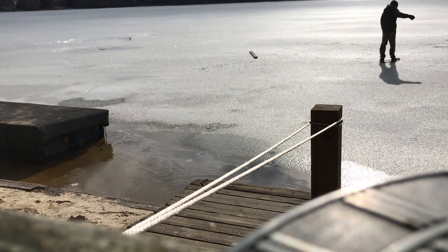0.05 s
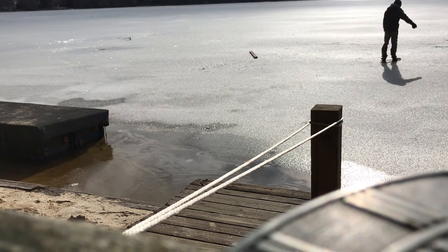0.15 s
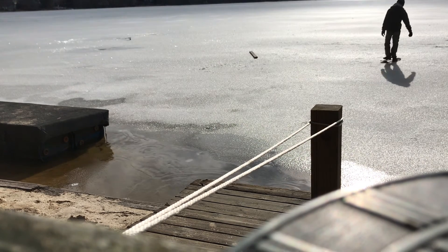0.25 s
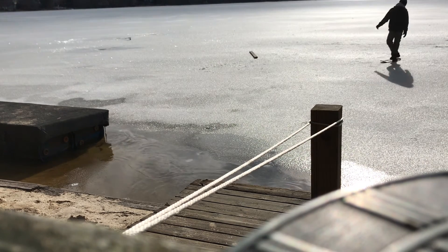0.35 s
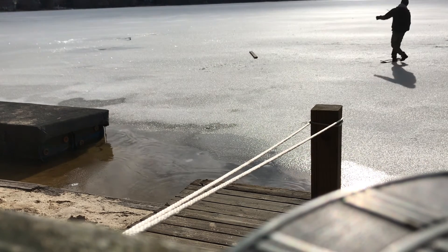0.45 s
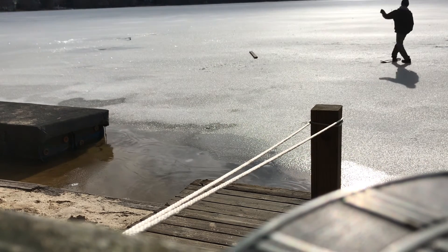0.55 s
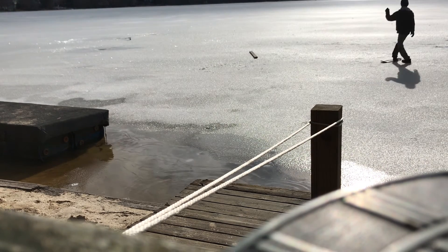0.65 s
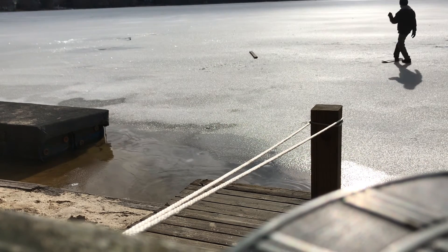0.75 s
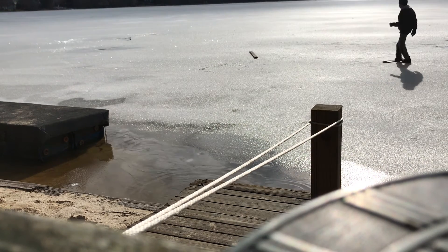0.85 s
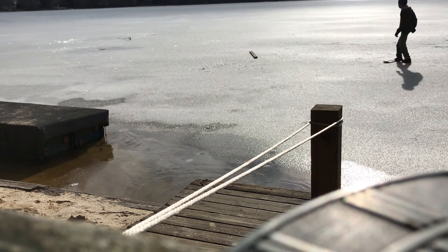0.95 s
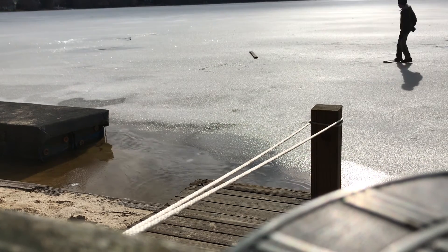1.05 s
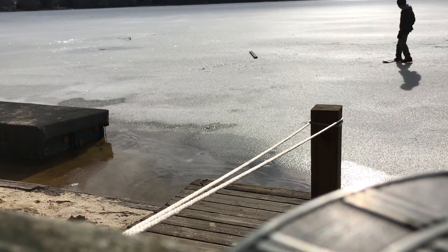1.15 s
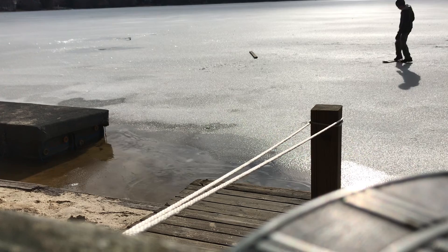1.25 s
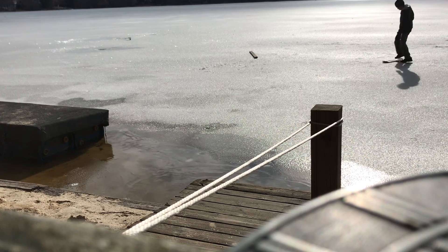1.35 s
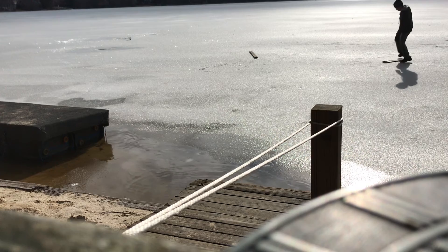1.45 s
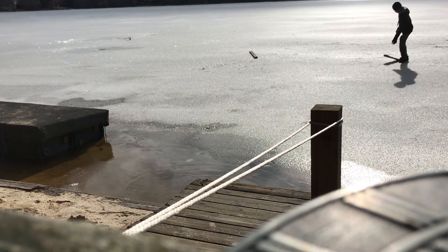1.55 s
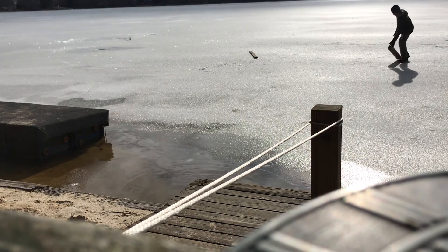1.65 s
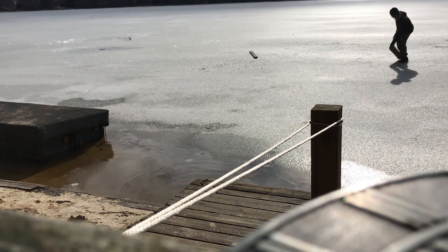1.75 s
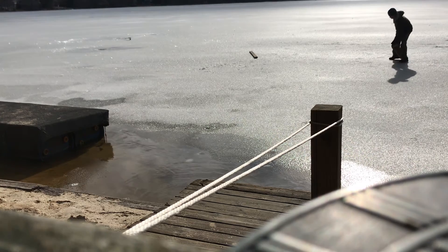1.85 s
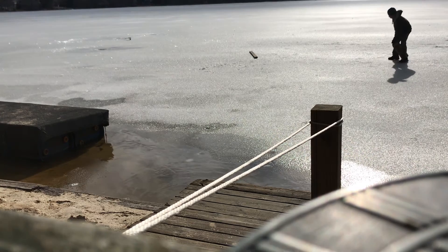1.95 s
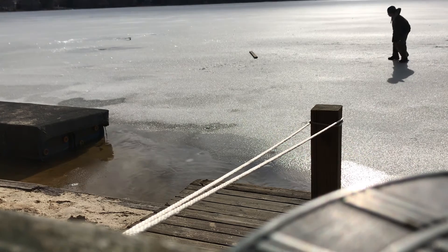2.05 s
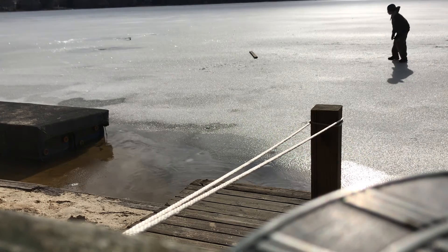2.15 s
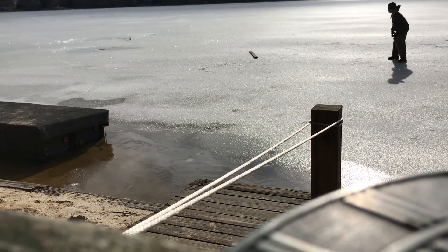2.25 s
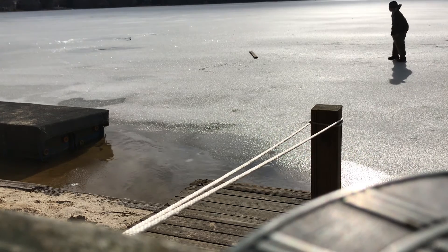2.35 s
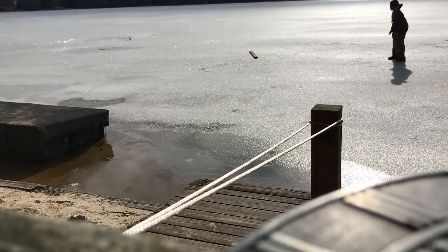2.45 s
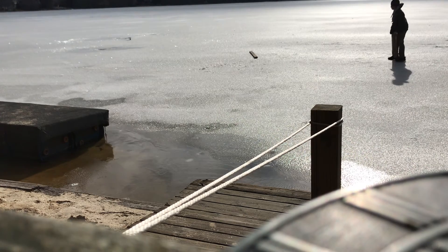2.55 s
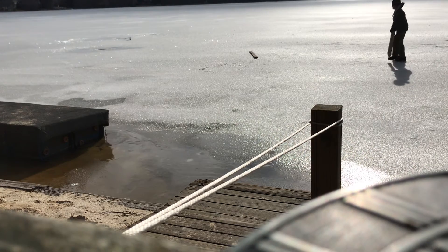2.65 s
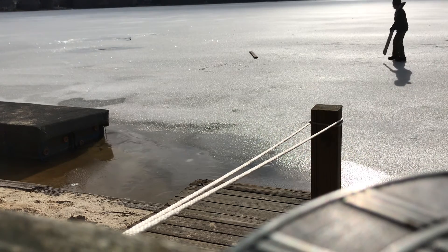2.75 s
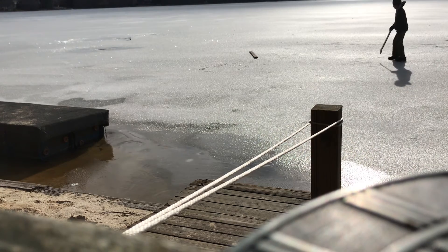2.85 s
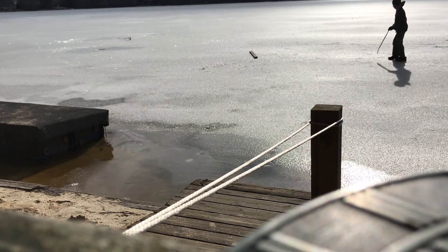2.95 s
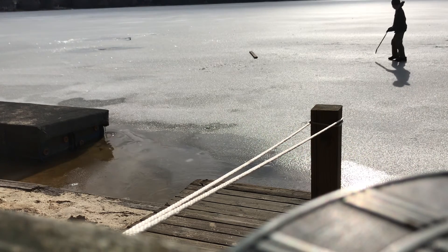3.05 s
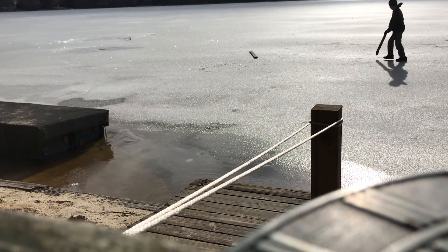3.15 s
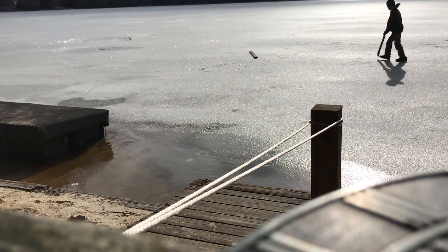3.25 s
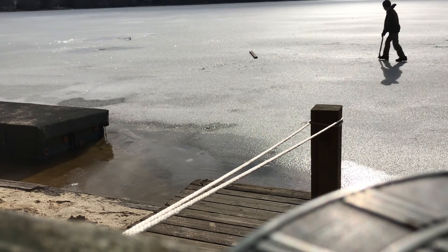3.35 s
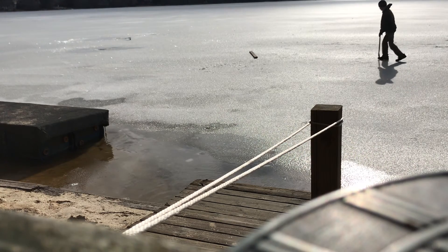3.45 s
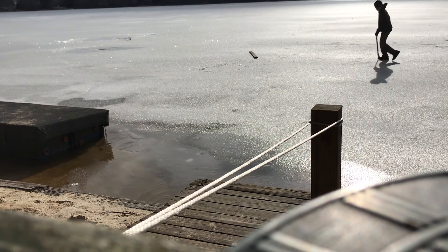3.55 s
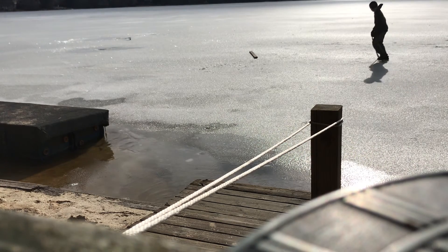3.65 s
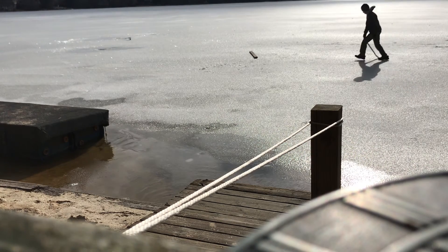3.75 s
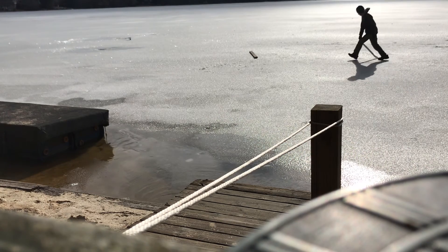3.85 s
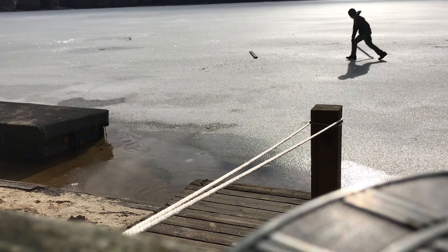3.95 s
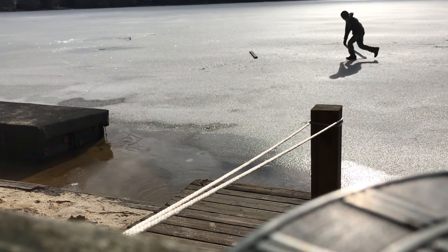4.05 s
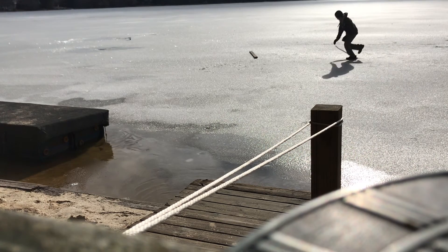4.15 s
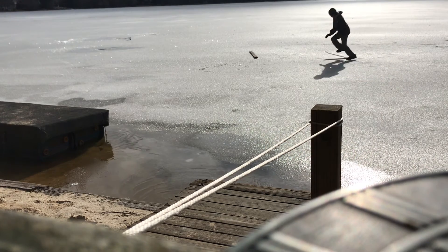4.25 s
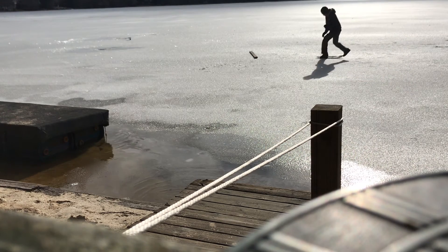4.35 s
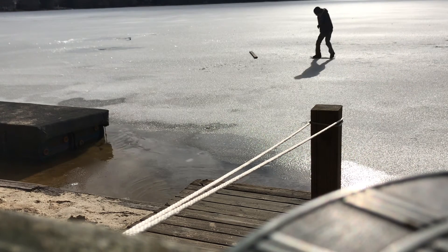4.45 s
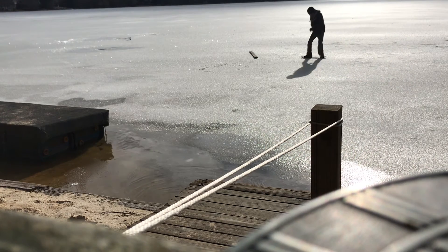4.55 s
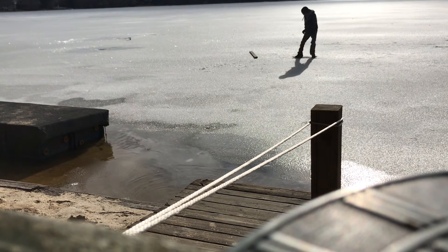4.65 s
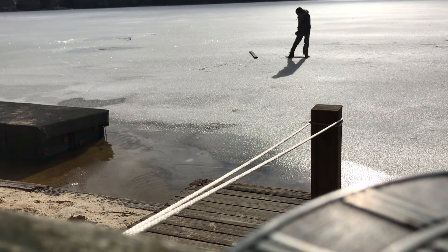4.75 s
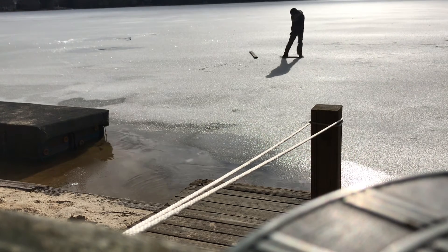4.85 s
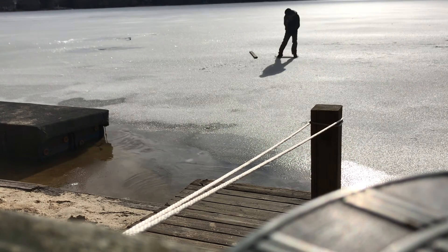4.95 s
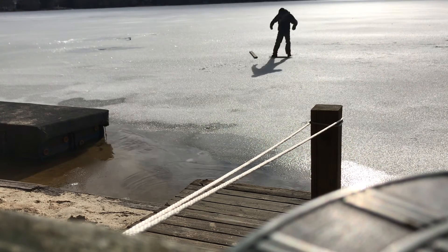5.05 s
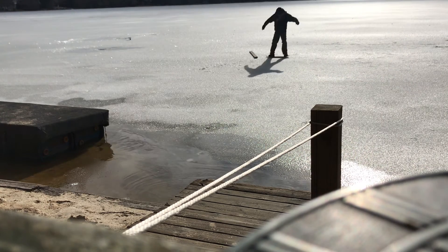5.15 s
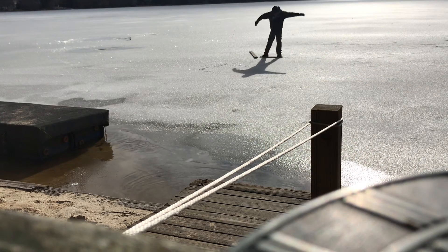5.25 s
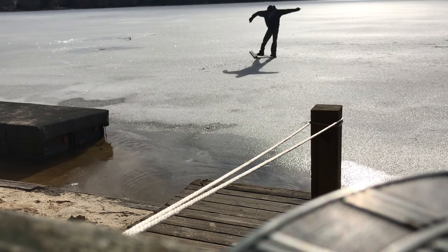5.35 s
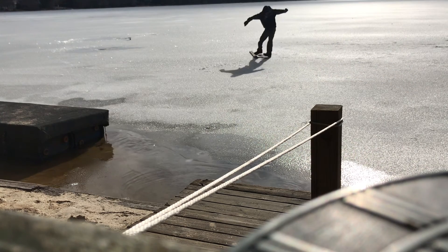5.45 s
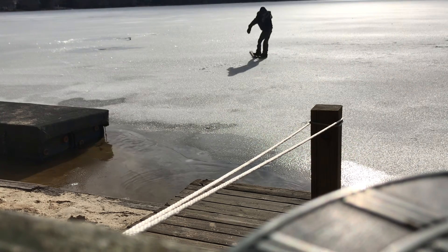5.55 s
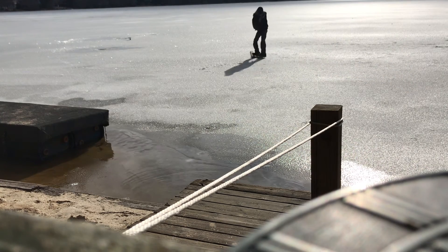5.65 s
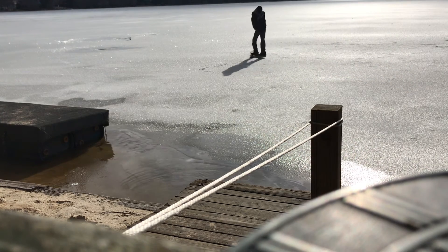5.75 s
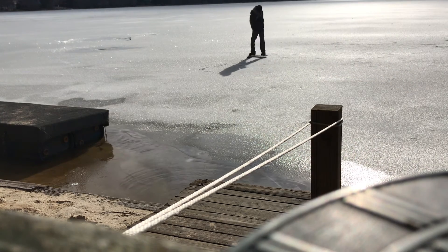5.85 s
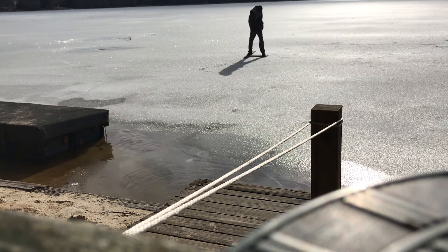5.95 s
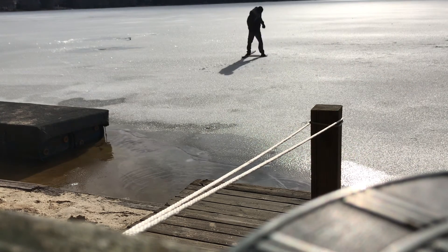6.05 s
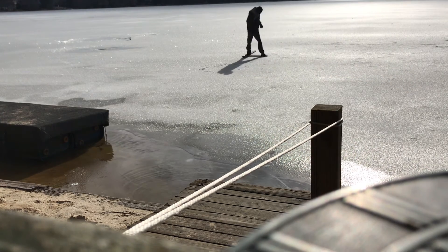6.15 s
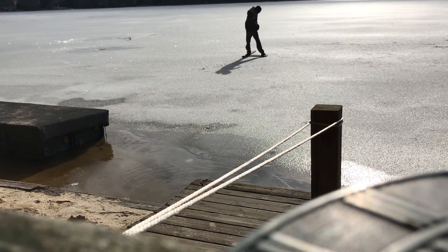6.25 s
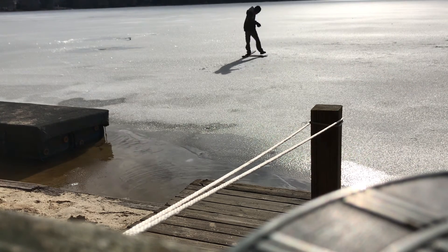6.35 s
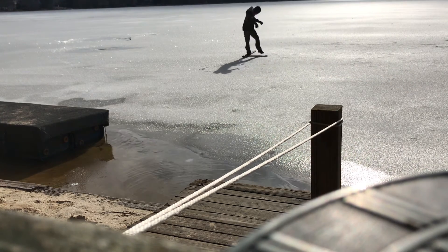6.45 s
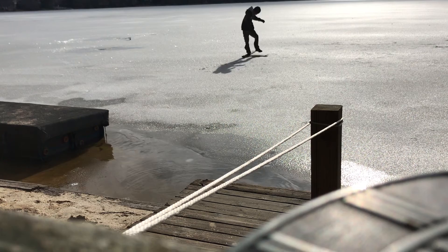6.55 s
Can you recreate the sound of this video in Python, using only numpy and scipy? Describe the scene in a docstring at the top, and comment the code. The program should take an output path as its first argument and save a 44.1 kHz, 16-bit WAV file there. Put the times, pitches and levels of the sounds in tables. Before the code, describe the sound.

Outdoors by a frozen lake, the microphone on the shore hears low distant murmur, faint hiss and light wind rumble. At 0 s a short boot scuff fades, with a few crust clicks around 0.1 s. Small ticks and dull knocks follow near 0.5-1.2 s, then a soft shuffle with clicks and crunches from 1.5 to 2 s. A very faint thin bird whistle comes at 1.4 s and again at 3.75 s. From 2 to 3.9 s it is nearly quiet, with sparse ticks. Light quick steps tick at 3.9-4.3 s, then a loud sharp crack and knock at 4.36-4.45 s starts a gritty, hollow, changing scrape full of crunches. A snap at 4.88 s and the strongest double crack at 5.05 s follow, with more snaps to 5.4 s. The scraping thins out by 6.1 s while low wind buffets thump, and rumble surges at the very end, 6.6 s.

```python
"""Boots and a board scrape and crunch the crust of a frozen lake: a shuffle, then a run and a slide.
Scrapes are clumped random grains ringing crust modes and a moving hollow; snaps are short ringing bursts.
Low thuds are gliding sine pulses: knocks through the ice, and at the end low wind buffets on the microphone.
A small bird seeps twice, a whistle of drifting pitch; a faint scatter follows the feet.
Far air murmur, hiss and wind rumble are shaped noise."""
import sys
import numpy as np
from scipy import signal
from scipy.fft import rfft, irfft
from scipy.io import wavfile

SR = 44100
rng = np.random.default_rng(int(sys.argv[2]) if len(sys.argv) > 2 else 0)


def store_pcm(level_fs):
    """Save levels as 16-bit WAV."""
    pcm = np.round(np.clip(level_fs, -1, 1) * 32767).astype(np.int16)
    wavfile.write(sys.argv[1], SR, np.atleast_2d(pcm).T)


N = 291060

# resonances of crust and board: (pitch [Hz], width [Hz], relative level [dB])
KNOCK_MODES = [(670, 152, 1), (920, 148, 5), (1363, 164, 1), (1734, 225, 2.5), (2070, 347, -3)]
# crust and board, upper range: (pitch [Hz], width [Hz], relative level [dB])
GRIT_MODES = [(3024, 2250, 8), (3780, 1810, 11), (4610, 410, 8), (5380, 1140, -4), (6664, 560, 3),
              (6720, 285, 4)]
# crust and board, top range: (pitch [Hz], width [Hz], relative level [dB])
FIZZ_MODES = [(7900, 4500, 12), (10100, 810, -24), (11400, 970, 4), (13400, 5000, -11), (16300, 6600, 7)]
SCUFF_HOLLOW_HZ = 1108


def from_db(db):
    """Gain of a level in dB."""
    return 10 ** (np.asarray(db) / 20)


def rms_one(x):
    """Scale to rms 1."""
    return x / np.sqrt(np.mean(x ** 2) + 1e-20)


def in_time(rows):
    """Columns of a curve, interpolated at each sample."""
    s, *columns = np.transpose(rows)
    return [np.interp(np.arange(N) / SR, s, c) for c in columns]


def in_spans(tables, fade_s):
    """Joined curves of several spans, and a gate that is open inside them."""
    t = np.arange(N) / SR
    gate = 0
    for rows in tables:
        edge_s = np.minimum(t - rows[0][0], rows[-1][0] - t)
        gate = gate + np.clip(edge_s / fade_s + .5, 0, 1)
    return gate, in_time([row for rows in tables for row in rows])


def drift(rate_hz):
    """Slow random curve of rms 1: noise through a double pole, run at SR / 10."""
    r = np.exp(-20 * np.pi * rate_hz / SR)
    noise = rng.standard_normal(N // 10 + 4002)
    slow = signal.lfilter([1], [1, -2 * r, r * r], noise)[4000:]
    return np.interp(np.arange(N) / 10, np.arange(len(slow)), rms_one(slow))


def resonance(hz, width_hz):
    """Two-pole band-pass with gain 1 on top."""
    r = np.exp(-np.pi * width_hz / SR)
    return (1 - r * r) / 2 * np.array([1, 0, -1]), [1, -2 * r * np.cos(2 * np.pi * hz / SR), r * r]


def body(x, modes, shifting_db=0):
    """Parallel resonances that keep the level of white noise; their balance may shift as the contact moves."""
    click = np.zeros(4096)
    click[0] = 1
    gains = [(-1) ** k * from_db(db) for k, (hz, width_hz, db) in enumerate(modes)]
    filters = [resonance(hz, width_hz) for hz, width_hz, db in modes]
    response = sum(g * signal.lfilter(*f, click) for g, f in zip(gains, filters))
    scale = np.sqrt(np.sum(response ** 2))
    shifts = [from_db(shifting_db * drift(7.4)) if shifting_db else 1 for f in filters]
    return sum(g * shift * signal.lfilter(*f, x + 1e-18)
               for g, shift, f in zip(gains, shifts, filters)) / scale


def coloured(spectrum):
    """Steady noise of rms 1, its spectrum interpolated over log frequency."""
    hz = np.fft.rfftfreq(N, 1 / SR) + 1
    at_hz, db = np.transpose(spectrum)
    gain = from_db(np.interp(np.log(hz), np.log(at_hz), db))
    return rms_one(irfft(rfft(rng.standard_normal(N)) * gain, N))


def air():
    """Distant murmur, faint hiss and lumpy wind rumble: shaped noise on slow level curves."""
    # open air: (time [s], murmur level [dB], hiss level [dB])
    air_curve = [(0, -55, -74.5), (2, -55.5, -73.5), (4, -56, -75.5), (5, -51.5, -69), (6.1, -51, -70),
                 (6.6, -53, -73.5)]
    # wind on the microphone, rising at the end: (time [s], rumble level [dB])
    wind_curve = [(0.0, -50), (0.8, -54), (1.6, -52.5), (2.4, -58), (3.3, -54.5), (4.13, -58.5),
                  (4.45, -55), (5.55, -60), (5.65, -52), (5.89, -47.5), (6.1, -38), (6.31, -47),
                  (6.45, -40.5), (6.55, -48), (6.6, -21)]
    # (frequency [Hz], relative density [dB per Hz])
    murmur_spectrum = [(65, -9), (110, -5), (134, -1), (163, -9), (407, -16.5), (615, -19.5), (777, -19.5),
                       (930, -19), (1040, -19.5), (1380, -24.5), (8000, -56), (10400, -73), (17600, -120)]
    # (frequency [Hz], relative density [dB per Hz])
    hiss_spectrum = [(1760, -24), (3000, -11), (4070, -10.5), (10600, -17.5), (12900, -12.5),
                     (15700, -18.5), (16100, -36), (16400, -42)]
    # (frequency [Hz], relative density [dB per Hz])
    rumble_spectrum = [(15, -29), (25, 12.5), (49, -5.5), (64, 7), (107, -10.5), (145, -10.5), (220, -19.5),
                       (290, -69), (480, -120)]
    murmur_db, hiss_db = in_time(air_curve)
    rumble_db, = in_time(wind_curve)
    waver_db = .6 * drift(5)
    gusts_db = 1.2 * drift(12) + 2 * drift(1.75)
    murmur = from_db(murmur_db + waver_db) * coloured(murmur_spectrum)
    hiss = from_db(hiss_db) * coloured(hiss_spectrum)
    rumble = from_db(rumble_db + gusts_db) * coloured(rumble_spectrum)
    return murmur + hiss + rumble


def bird():
    """A thin whistle: a sine that slurs up, sags, and drifts in pitch and level."""
    # bird notes: (start [s], top pitch [Hz], top level [dB])
    seeps = [(1.4, 8857, -76), (3.745, 8559, -79)]
    rise_s, length_s, slur_hz, sag_hz = 0.033, 0.13, 170, 70
    start_db, end_db = -8.5, -5.0   # re top
    notes = [[(s, hz - slur_hz, db + start_db), (s + rise_s, hz, db),
              (s + length_s, hz - sag_hz, db + end_db)] for s, hz, db in seeps]
    gate, (hz, level_db) = in_spans(notes, fade_s=.015)
    phase = 2 * np.pi * np.cumsum(hz + 40 * drift(60)) / SR
    return gate * from_db(level_db + 3.1 * drift(40)) * np.sin(phase)


def shore(x, t60_s):
    """Faint dull scatter back from ice and bank: convolution with decaying low-passed noise."""
    t = np.arange(round(.3 * SR)) / SR
    noise = signal.lfilter([.5], [1, -.55], rng.standard_normal(len(t)))
    tail = noise * from_db(-60 * t / t60_s) * (t > .004)
    return signal.fftconvolve(x, tail / np.sqrt(np.sum(tail ** 2)))[:N]


def thuds():
    """Swelling and fading sine pulses, mostly gliding down: knocks through the ice, then wind buffets."""
    # knocks through the ice; from 5.635 s on, low wind buffets on the microphone:
    # (start [s], peak [dB], middle pitch [Hz], length [s], pitch drop [octaves])
    pulses = [(0.237, -41, 151, 0.027, 1.46), (0.956, -32.5, 180, 0.015, 1.3),
              (1.533, -34.5, 323, 0.011, 2), (2.685, -37, 82.5, 0.02, -0.01),
              (3.385, -36.5, 315, 0.024, 1.7), (4.344, -34, 443, 0.015, 1.5),
              (4.401, -19, 404, 0.0057, 0.97), (4.406, -28, 402, 0.008, 0.44),
              (4.419, -29, 336, 0.013, 0.61), (4.438, -22.5, 538, 0.0075, -0.47),
              (5.042, -25, 415, 0.0074, -0.87), (5.057, -22.5, 670, 0.0084, -0.029),
              (5.532, -40, 440, 0.0097, 1.4), (5.571, -37, 554, 0.016, 0.98),
              (5.635, -42.5, 73.5, 0.038, 0.43), (5.782, -36.5, 70, 0.026, 0.6),
              (5.811, -36, 60, 0.036, 0.6), (6.03, -32.5, 70, 0.032, 2.3), (6.128, -25, 113, 0.015, 2.2),
              (6.157, -22.5, 63, 0.026, 0.011), (6.398, -33.5, 67.7, 0.023, 0.49),
              (6.437, -40, 95, 0.022, 0.44), (6.488, -35.5, 107, 0.038, -0.72)]
    out = np.zeros(N + 8000)
    for s, peak_db, hz, length_s, drop_octaves in pulses:
        done = np.arange(round(np.clip(length_s, .005, .15) * SR)) / SR / length_s
        phase = 2 * np.pi * np.cumsum(hz * 2 ** (drop_octaves * (.5 - done))) / SR
        swell = np.sin(np.pi * np.minimum(done, 1) ** 0.92) ** 0.92
        i = round(s * SR)
        out[i:i + len(done)] += from_db(peak_db) * swell * np.sin(phase)
    return out[:N]


def faint_snaps(drag):
    """Rows of random snaps in the crust, sized by the drag at their moment."""
    candidates_per_s, kept_per_s = 30, 14
    knock_db, fizz_db = 2.5, -26   # re grit
    rows = []
    for when, size, pitch, chance in rng.random((round(candidates_per_s * N / SR), 4)):
        if chance * candidates_per_s >= kept_per_s:
            continue
        when *= .99
        drag_db = 20 * np.log10(drag[int(when * N)] + 1e-9)
        rows.append((when * N / SR, drag_db + 8.5 + 7.3 * size, knock_db, fizz_db, 900 + 335.5 * pitch))
    return rows


def snaps(drag):
    """Each snap is a noise burst dying within milliseconds; it rings the crust and a knock pitch of its own."""
    # crust snapping: (start [s], grit drive [dB], knock re grit [dB], fizz re grit [dB], knock pitch [Hz])
    set_snaps = [(0.1095, -48, -12, -19, 950), (0.1344, -26, -13, -11.5, 915),
                 (0.144, -37.5, -3, -14, 1500), (0.5331, -37, -1.5, -7, 1880), (0.54, -42, 1, -9, 1720),
                 (0.616, -45.5, 4.5, -4, 2200), (0.624, -38, -0.5, -11, 1950),
                 (0.779, -52.5, 7.5, -15, 1510), (0.8989, -36.5, 6.5, -33, 1830),
                 (0.923, -28.5, -0.5, -43, 1140), (1.039, -49, 7, 3.5, 1610), (1.1508, -49.5, 0, -16, 990),
                 (1.1747, -48, 2, -3, 1050), (1.4545, -50, -21, -22, 904), (1.5334, -32.5, -1, -7, 750),
                 (1.5815, -36, 8, -9, 1580), (1.5923, -25.5, -15, -17, 1020), (1.8235, -33, -5, -3.5, 1010),
                 (1.8344, -32.5, -1.5, -26, 1150), (1.8474, -35.5, -2, -15, 1020),
                 (1.8688, -27, -2.5, -3.5, 1220), (1.8774, -41, 1.5, -1, 1860),
                 (1.9974, -48.5, -14, 2, 904), (2.3486, -49, -21, -7, 904), (2.442, -51, -16, -23, 1030),
                 (2.7566, -56.5, 5, -17, 900), (3.1153, -47.5, -3, -2, 894), (3.3083, -47.5, -6, -7, 845),
                 (3.3999, -37.5, -5, 0.5, 1450), (3.4197, -50, 0.5, -2, 999), (3.734, -52, 1, -21, 915),
                 (3.933, -43.5, -7, -7, 710), (3.9447, -41, -12, -6, 1000), (3.95, -48, 3, -16, 1480),
                 (3.9604, -43, -10, -11, 1340), (3.968, -44, -15, -22, 1090), (4.0697, -57, 12, -15, 1110),
                 (4.1535, -44, 0.5, -7, 960), (4.186, -37, -1, -6, 1050), (4.192, -40, -2.5, -16, 1020),
                 (4.232, -39, -6, -19, 670), (4.2547, -43, -18, -16, 1480), (4.2877, -29, -2, -8.5, 1060),
                 (4.3612, -8, 0, -12.5, 935), (4.4012, -20, -2, -9, 1020), (4.4205, -14, -9.5, -16, 1410),
                 (4.4414, -20.5, 0, -9, 840), (4.4678, -27, -3, -7, 980), (4.6586, -32, 3, -20, 1260),
                 (4.8773, -18.5, -3, -23, 940), (4.9983, -36, 5, -28, 1440), (5.0424, -14, 3.5, -7.5, 1480),
                 (5.0544, -6, -8.5, -15.5, 1456), (5.146, -31, -5, 8, 985), (5.1721, -21, -0.5, -9, 1500),
                 (5.193, -25, -19, -3, 1410), (5.2061, -16, -29, -12, 960), (5.3143, -20, -0.5, -26, 894),
                 (5.408, -32.5, 4, -20, 1310), (5.566, -31.5, -12, 2, 1420), (5.6496, -31.5, -3, -6, 1480),
                 (5.7001, -35, 9, -33.5, 1050), (5.8097, -37, 8, 2.5, 1300), (6.0064, -38, 6, -22, 1290)]
    rows = set_snaps + faint_snaps(drag)
    base_rise_s, base_fall_s, fizz_fall_s = 0.0012, 0.0024, 0.0029
    hard_knock_db = -11   # a knock drive this strong breaks twice as fast
    knock, ring, grit, fizz = np.zeros((4, N))
    t = np.arange(1500) / SR
    noise = rng.standard_normal((len(rows), 1500))
    for (s, drive_db, knock_db, fizz_db, knock_hz), burst in zip(rows, noise):
        haste = 1 + from_db(drive_db + knock_db - hard_knock_db) ** 2
        rise = np.minimum(haste * t / base_rise_s, 1)
        shape = from_db(drive_db) * rise * np.exp(-t * haste / base_fall_s)
        build = ((t * knock_hz / 2.0) * np.exp(1 - t * knock_hz / 1.39)) ** 2   # peaks 1.39 cycles in
        swing = from_db(drive_db) * build + 0.12 * shape
        near_pitch = rms_one(signal.lfilter(*resonance(knock_hz, 1.37 * knock_hz), burst))
        tone = np.sin(2 * np.pi * knock_hz * t + burst[0])   # random phase
        i = round(s * SR)
        grit[i:i + 1500] += shape * burst
        knock[i:i + 1500] += from_db(knock_db) * shape * near_pitch
        ring[i:i + 1500] += from_db(knock_db) * swing * tone
        fizz[i:i + 1500] += from_db(fizz_db) * shape * burst * np.exp(-t / fizz_fall_s)   # top dies first
    return (from_db(-9) * body(knock, KNOCK_MODES) + from_db(1) * ring
            + from_db(-6) * body(grit, GRIT_MODES) + from_db(-1.5) * body(fizz, FIZZ_MODES))


def grains(per_s, spread_db, clump_db):
    """Random breakages of uneven size that come in clumps, each a short noise burst; rms 1."""
    born = rng.random(N) < per_s / SR
    sizes = from_db(spread_db * np.minimum(rng.exponential(1, N), 5)) * born
    bursts = signal.lfilter([1], [1, -.92], sizes) * rng.standard_normal(N)
    return rms_one(bursts * from_db(clump_db * (drift(40) + 0.12 * drift(29.0))))


def hollow(x, pitch_hz, width_hz):
    """The gap under the sole rings at a pitch that moves with the slide; rms 1."""
    out, state = np.zeros(N), np.zeros(2)
    for i in range(0, N, 256):
        b, a = resonance(pitch_hz[i], width_hz)
        out[i:i + 256], state = signal.lfilter(b, a, x[i:i + 256], zi=state)
    return rms_one(out)


def crunch_swells():
    """Grit, knock and fizz gains of crust crushed under weight, each a quick swell and fade."""
    # crushed crust: (start [s], length [ms], grit drive [dB], knock re grit [dB])
    crunches = [(1.593, 22, -40, 6.5), (1.815, 9.7, -52, 4), (1.9, 107, -70.5, 14), (4.012, 20, -72, 12),
                (4.067, 28, -75.5, 19.5), (4.332, 15, -54.5, 8), (4.431, 22, -37, 3), (4.50, 22, -67, 16),
                (4.549, 32, -39, -13), (4.57, 16.8, -34, 2.5), (4.595, 15, -42, 7),
                (4.641, 33, -38.5, -0.5), (4.669, 17.3, -42.5, 0), (4.702, 26, -49, -8),
                (4.775, 29, -50, 14), (4.81, 23, -44, 8), (4.841, 27, -36.5, -1.5), (4.873, 10, -36, 9.5),
                (4.885, 44, -37.5, -25), (4.928, 53, -45, 4), (4.976, 32, -43.5, 3),
                (5.065, 44.4, -41.5, 4.5), (5.162, 23, -51, 5), (5.223, 37, -67, -2),
                (5.272, 16, -33.5, -1), (5.287, 24.5, -34, 0), (5.313, 9.6, -31, -19),
                (5.346, 14, -43, -15), (5.426, 35, -51, 0), (5.53, 21, -51.5, 1), (5.564, 19, -43.5, 6),
                (5.586, 14.5, -42, 5.5), (5.81, 21, -57, 10), (5.974, 26, -52, -12), (6.016, 50, -52, 7.5)]
    fizz_db = -13   # re grit
    gains = np.zeros((3, N))
    for s, length_ms, grit_db, knock_db in crunches:
        i, span = round(s * SR), round(length_ms * SR / 1000)
        swell = np.sin(np.pi * (np.arange(span) / span) ** 0.58)
        gains[:, i:i + span] += from_db(grit_db + np.array([[0], [knock_db], [fizz_db]])) * swell
    return gains


def dragging():
    """Drag gain, grit dB and hollow pitch: each scuff swells and fades, the slide follows its curve."""
    # short boot scuffs: (start [s], peak [s], end [s], peak drive [dB], fade [dB/s], grit re drag [dB])
    scuffs = [(-0.01, 0.0, 0.37, -42.5, 143, -5.5), (0.725, 0.897, 1.42, -57, 42, -9.5),
              (1.505, 1.534, 2.06, -58, 18, -11.5), (3.89, 4.307, 4.4, -63.5, 10, -4.5)]
    # the long slide: (time [s], drag drive [dB], grit re drag [dB], hollow pitch [Hz])
    slide = [(4.36, -56, -1, 980), (4.526, -38, -10, 1087), (4.646, -43, -9, 1147),
             (4.756, -39.5, -12, 880), (4.894, -37.5, -12, 933), (5.035, -49, -5, 1210),
             (5.108, -47, -6, 1065), (5.244, -37.5, -2.5, 1185), (5.338, -44.5, -7.5, 970),
             (5.39, -47.5, -7, 1050), (5.41, -48.5, -3.5, 1350), (5.61, -47.5, -10.5, 1327),
             (5.64, -58.5, -4, 1420), (5.838, -49.5, -17, 1435), (5.938, -57, -12, 1470),
             (6.005, -52.5, -14, 1294), (6.075, -55.5, -11, 1350), (6.12, -64, -11, 1300)]
    swell_db = 14.5
    spans = []
    for start_s, peak_s, end_s, db, fade_db_per_s, grit_db in scuffs:
        end_db = db - fade_db_per_s * (end_s - peak_s)
        spans.append([(start_s, db - swell_db, grit_db, SCUFF_HOLLOW_HZ),
                      (peak_s, db, grit_db, SCUFF_HOLLOW_HZ),
                      (end_s, end_db, grit_db, SCUFF_HOLLOW_HZ)])
    gate, (drag_db, grit_db, pitch_hz) = in_spans(spans + [slide], fade_s=0.019)
    return np.minimum(gate, 1) * from_db(drag_db), grit_db, pitch_hz


def load(drag):
    """Gain of the low crunch: it follows the drag and jumps at each footfall."""
    # body weight landing on a foot: (time [s], low crunch drive [dB])
    footfalls = [(0.959, -53.5), (1.539, -49), (1.879, -47), (3.95, -54.5), (4.367, -30), (5.046, -39.5),
                 (5.539, -44.5), (6.01, -50)]
    fade_db_per_s, rise_s, weight_re_drag_db = 162, 0.002, -11.5
    t = np.arange(N) / SR
    gain = drag * from_db(weight_re_drag_db)
    for s, db in footfalls:
        fade = from_db(db - fade_db_per_s * np.maximum(t - s, 0))
        gain = gain + fade * np.clip((t - s) / rise_s, 0, 1)
    return gain


def scrape(drag, grit_db, pitch_hz):
    """Grains break under the sole: coarse ones sound the hollow and the crust, fine ones add the grit."""
    # low resonances of crust and board: (pitch [Hz], width [Hz], relative level [dB])
    weight_modes = [(274, 330, 0), (356.3, 126, 4), (448, 55, -12.5), (603, 29, 0)]
    hollow_db_per_octave = 9.0   # a tighter gap rings higher and more clearly
    grit, knock, fizz = crunch_swells()
    coarse = grains(per_s=1300.0, spread_db=-0.5, clump_db=1.0)
    fine = rms_one(0.45 * coarse + grains(per_s=3200.0, spread_db=3.0, clump_db=3.4))
    wander_hz = pitch_hz * (1 + 0.072 * drift(38))
    octaves = np.log2(pitch_hz / SCUFF_HOLLOW_HZ)
    hollow_db = -3.0 + hollow_db_per_octave * octaves + 1.82 * drift(44)
    low = from_db(-4) * body(coarse, KNOCK_MODES, shifting_db=2.75)
    low = low + from_db(hollow_db) * hollow(coarse, wander_hz, width_hz=71)
    heavy = body(grains(per_s=900.0, spread_db=2.0, clump_db=-0.5), weight_modes)
    bright = drag * from_db(grit_db)
    return ((drag + knock) * low + load(drag) * heavy
            + (bright + grit) * body(fine, GRIT_MODES, shifting_db=0.5)
            + (from_db(-8.5) * bright + fizz) * body(fine, FIZZ_MODES, shifting_db=2.5))


def scene():
    """Feet on the ice, their scatter, low thuds, the bird and the open air."""
    drag, grit_db, pitch_hz = dragging()
    feet = scrape(drag, grit_db, pitch_hz) + snaps(drag)
    scatter = from_db(-16.5) * shore(feet, t60_s=0.32)
    return (feet + scatter + thuds() + bird() + air())[None]


def record(dry):
    """The microphone drops the deepest bass; the top is cut steeply."""
    low_cut = signal.butter(4, 38, "high", fs=SR, output="sos")
    top_cut = signal.cheby2(14, 50, 16150, fs=SR, output="sos")   # 50 dB down from 16150 Hz
    return signal.sosfilt(top_cut, signal.sosfilt(low_cut, dry))


dry = scene()
out = record(dry)
store_pcm(out)
```